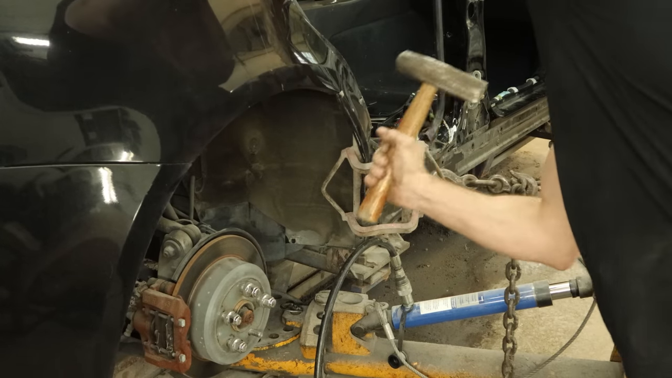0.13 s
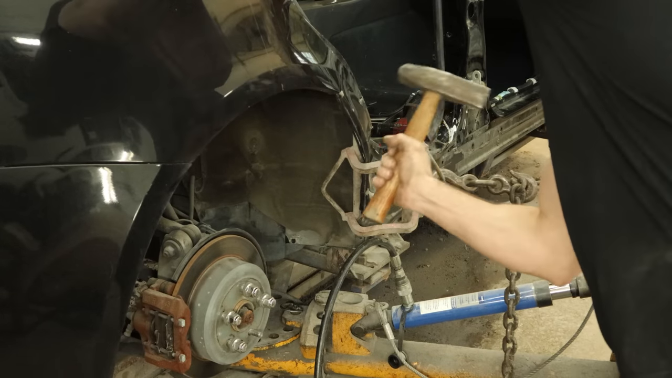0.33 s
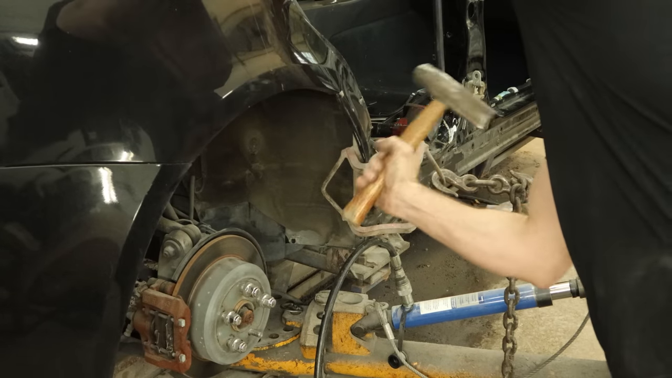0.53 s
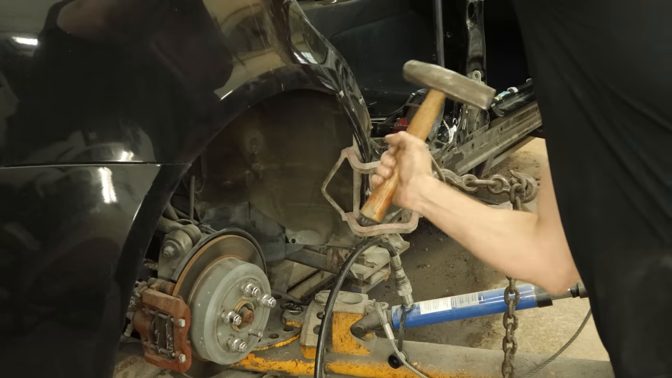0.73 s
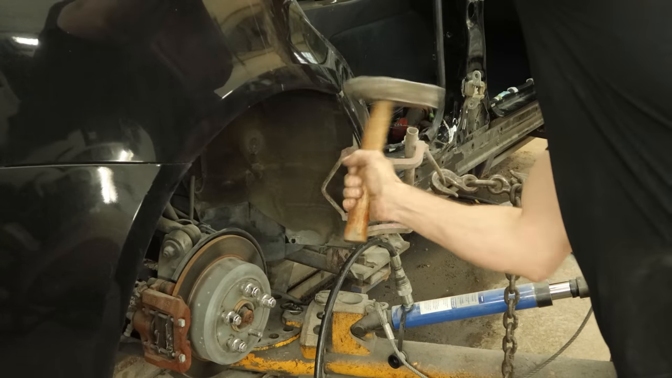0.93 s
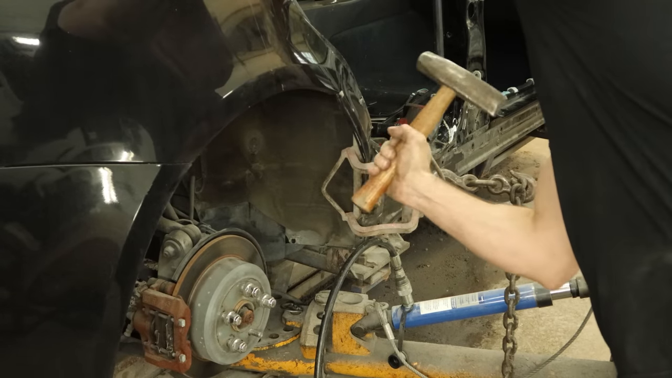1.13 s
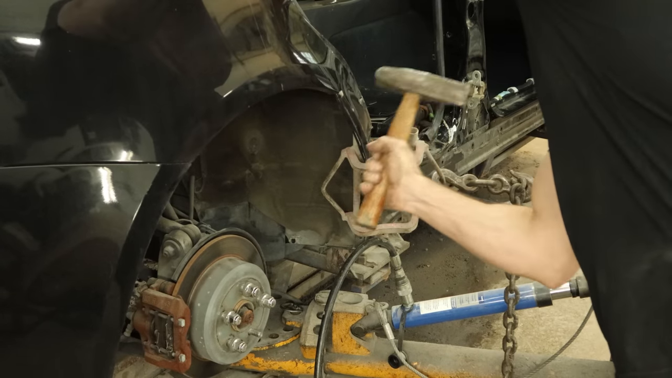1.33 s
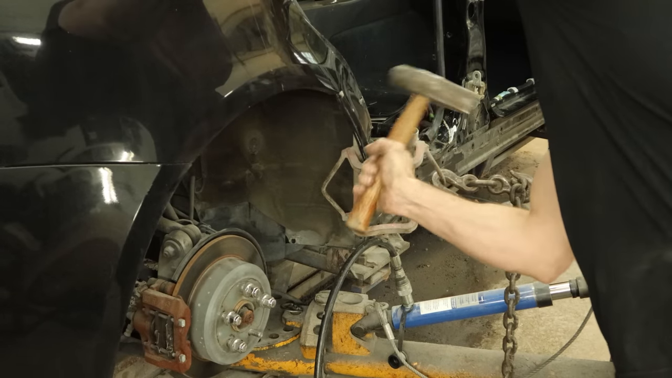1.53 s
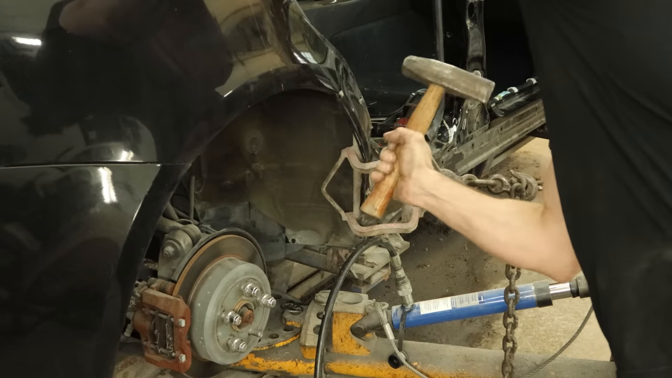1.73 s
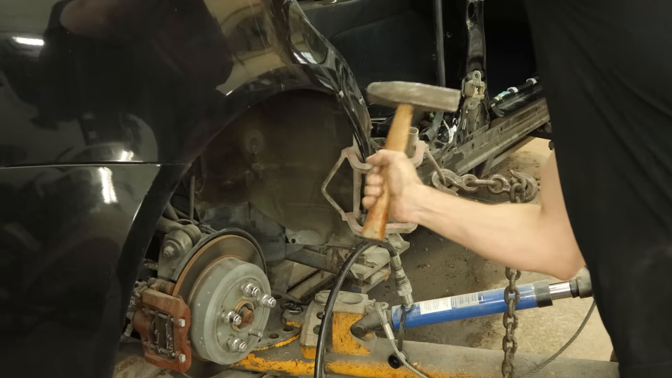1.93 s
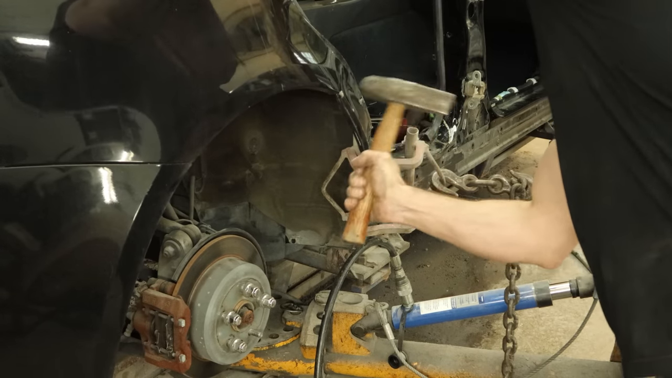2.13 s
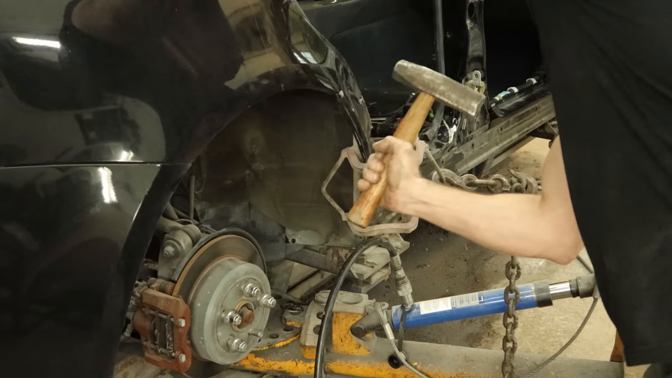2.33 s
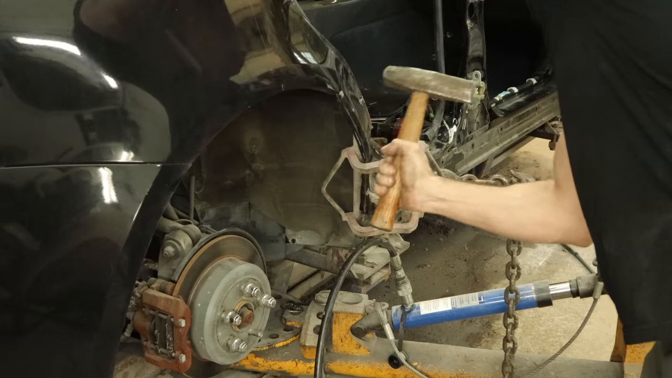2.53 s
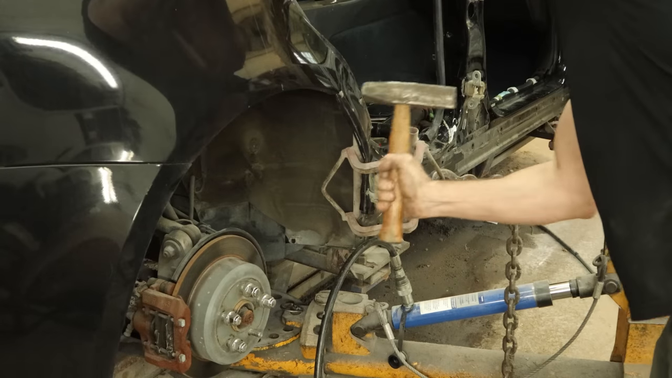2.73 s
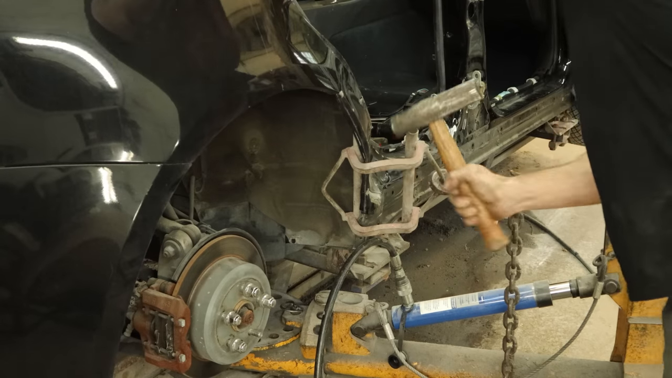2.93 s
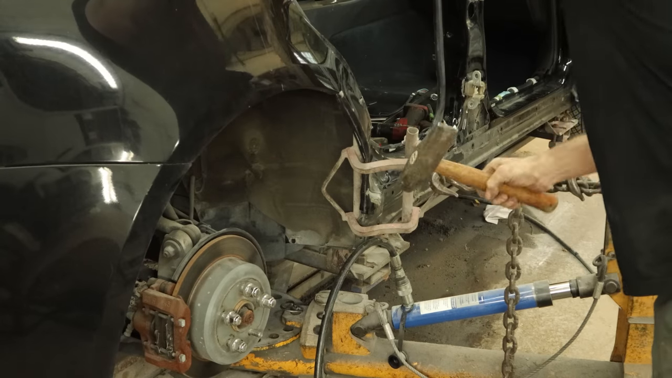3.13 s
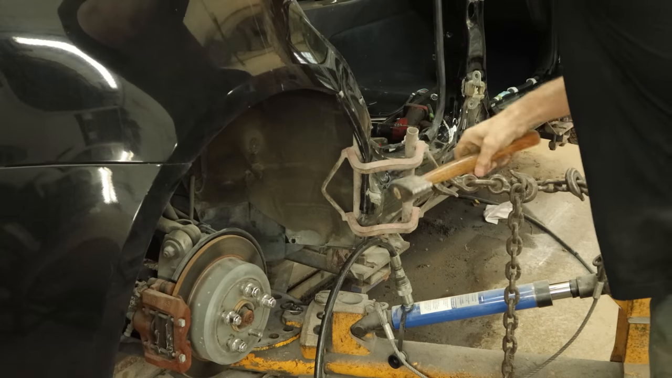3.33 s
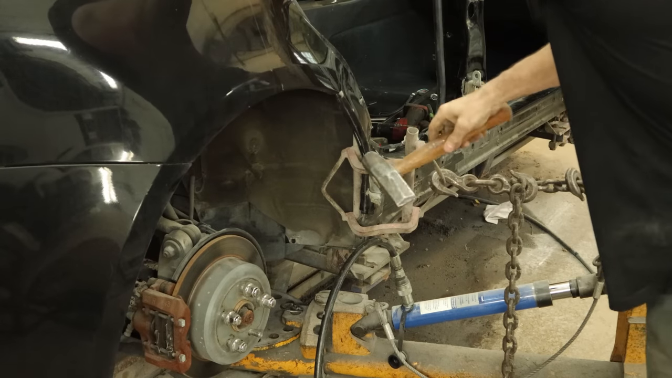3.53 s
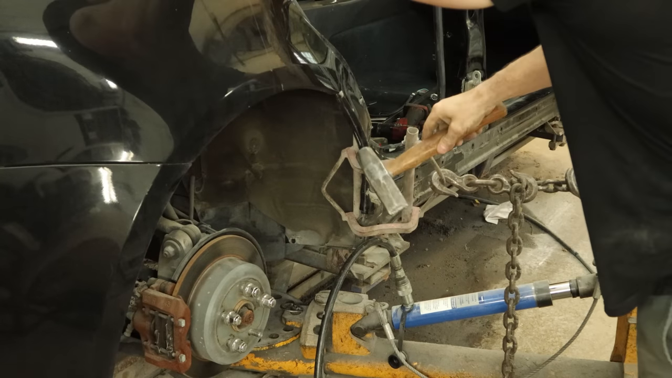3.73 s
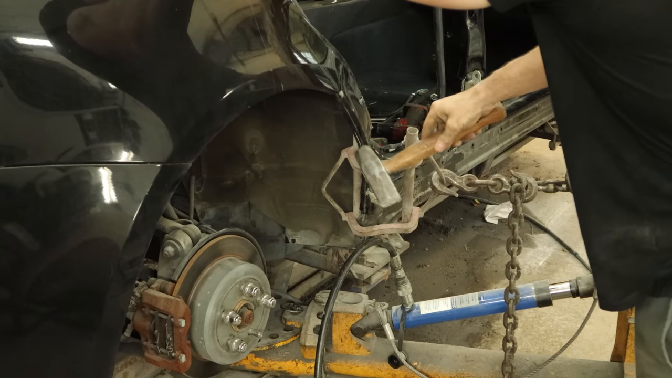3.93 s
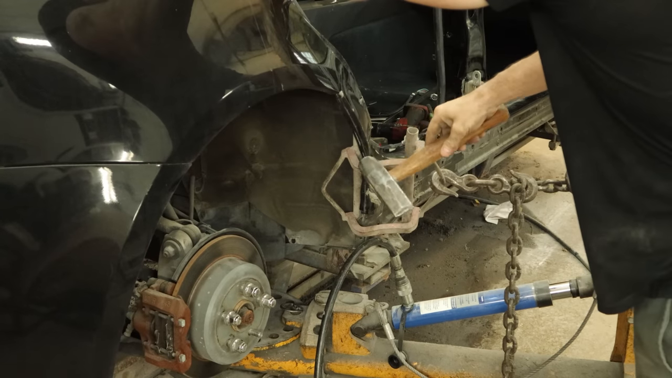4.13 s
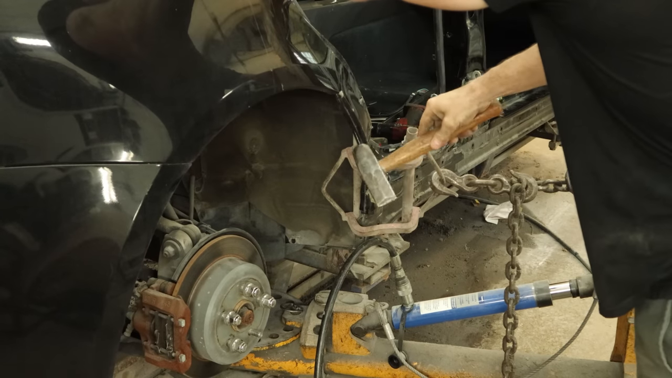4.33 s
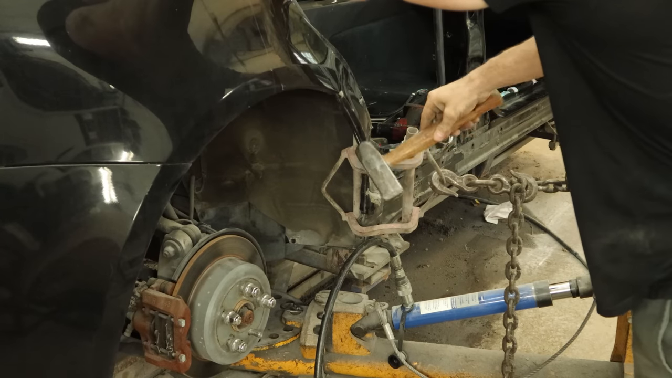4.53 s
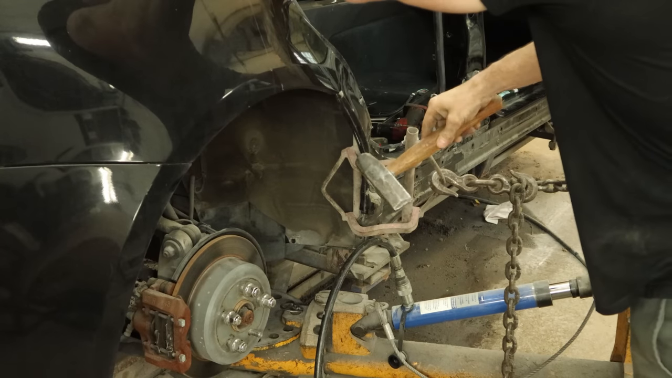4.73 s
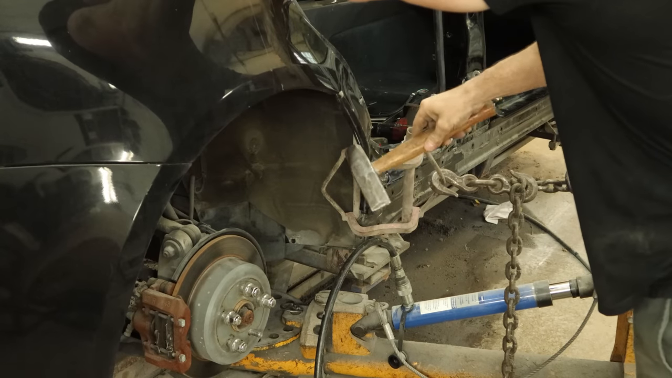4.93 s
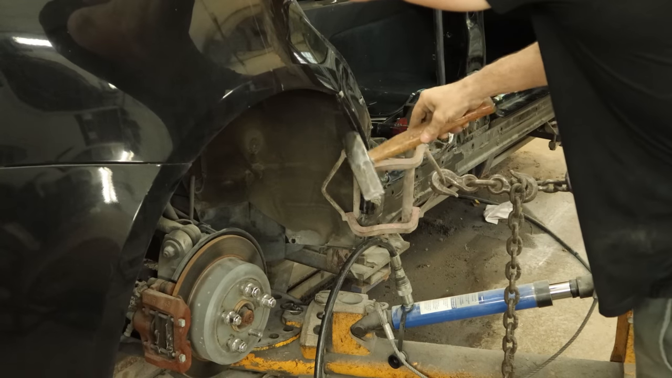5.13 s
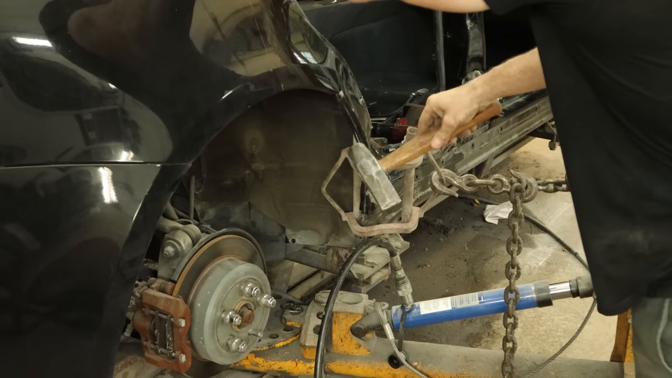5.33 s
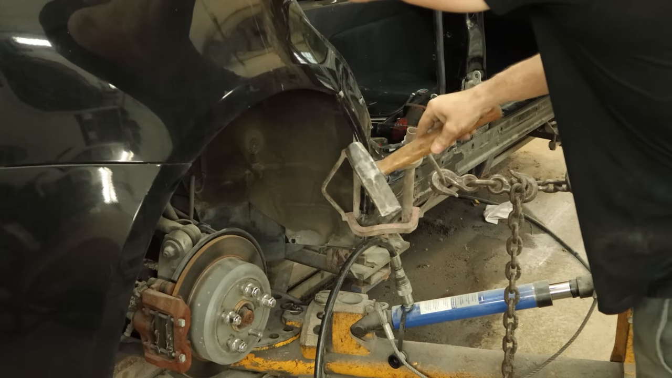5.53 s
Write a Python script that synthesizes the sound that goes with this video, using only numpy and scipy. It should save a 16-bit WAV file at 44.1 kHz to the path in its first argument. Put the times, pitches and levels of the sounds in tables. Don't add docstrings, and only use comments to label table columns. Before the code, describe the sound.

In an echoing repair workshop, a heavy hammer bangs a car's wheel arch nine times at a quick steady pace, each a short hard clang with low body. After a faint scuff and a pause, seven lighter glancing taps ring more clearly. Machinery hums and hisses faintly. The close microphone's limiter squashes the hard blows.

```python
import sys
import numpy as np
from scipy import signal
from scipy.fft import rfft, irfft
from scipy.io import wavfile
from scipy.ndimage import uniform_filter1d, minimum_filter1d

SR = 44100
rng = np.random.default_rng(int(sys.argv[2]) if len(sys.argv) > 2 else 0)


def rack_gain(trim_db):
    fader = np.asarray(trim_db, float)
    return 10 ** (fader / 20)


def dump(signal):
    limited = np.clip(np.atleast_2d(signal).T, -1, 1)
    pcm = np.round(limited * 32767).astype(np.int16)
    wavfile.write(sys.argv[1], SR, pcm)


N = 246210

# (frequency [Hz], level [dB per Hz])
HUM_SPECTRUM = [(18, -31.5), (40, -28.5), (65, -11.5), (90, -9.5), (145, -6.5), (230, -16.5), (310, -7.5),
                (420, -20), (960, -23), (2000, -34), (4000, -36), (10000, -35.5), (10700, -46),
                (16000, -54.5)]
# (frequency [Hz], width [Hz], level [dB])
MACHINE_WHINES = [(88, 10, -62), (4400, 200, -82), (6500, 150, -85), (7300, 260, -77), (8700, 200, -83),
                  (9650, 550, -75), (11950, 300, -82), (12650, 200, -89), (14600, 2600, -83)]
# (frequency [Hz], t60 [s])
HALL_T60 = [(60, 1), (200, 0.83), (700, 0.8), (2000, 0.89), (5000, 0.6), (12000, 0.37)]
# (frequency [Hz], level [dB])
HALL_COLOUR = [(50, 1), (200, 1), (700, -2), (2500, 1), (6000, 7), (14000, 2.5)]
# (frequency [Hz], level [dB])
CROWD_SHARE = [(150, -14), (800, -10), (1800, -6), (3000, 0)]
# (time [s], strength [dB], weight: bass up and treble down [dB], top octave [dB])
TAPS = [
    (3.172, -45.5, -4, 3),
    (3.772, -18.5, -3, -1.5),
    (4.089, -16, -1, -7),
    (4.385, -12, 1, 7),
    (4.6821, -5.5, 1.5, 2),
    (4.972, -15, 3, 3.5),
    (5.248, -16.5, 0.05, 2),
    (5.531, -15, 2.5, -1),
]
TAP_SPOTS_CM = [60, 89.3, 43.9, 17.85, 103.2, 41, 105.3, 23.15]
SILL_DENTS_HZ = [480, 592, 650, 910, 1003, 1079, 1215, 1300, 1470, 1620, 1800, 2330, 3125, 3595]
# (frequency [Hz], level [dB], t60 [s])
SILL_MODES = [(179, 2, .17), (228, -8, .22), (266, -13, .2), (345, -10, .11), (470, -10, .16)]
# (frequency [Hz], level [dB per Hz])
SILL_SHEET = [(24, -50.5), (60, -56), (130, -4.5), (175, -2.5), (300, -2.5), (500, -4), (1000, -10),
              (1600, -13), (2300, -21), (4000, -26), (7700, -35), (13000, -50), (16500, -55)]
# (frequency [Hz], t60 [s])
SILL_DAMPING = [(60, 0.49), (200, 0.1), (1000, 0.2), (4000, 0.064), (12000, 0.076)]
# (time [s], strength [dB], weight: bass up and treble down [dB], top octave [dB])
BLOWS = [
    (.3375, -4, 0, 2),
    (.7245, -1.5, 0, -1.5),
    (1.0628, -.5, 0, -2),
    (1.390, -2.5, 1.5, -4),
    (1.699, -1.5, 0, 1),
    (1.992, -6, 1, -7),
    (2.283, -6, 0.5, -0.5),
    (2.550, -4.5, 0, 1),
    (2.814, -4, -1, 0),
]
# (frequency [Hz], level [dB])
BLOW_DENT = [(1150, 0), (2100, -4)]
# (frequency [Hz], level [dB], t60 [s])
ARCH_MODES = [(117, -3, .14), (325, -10, .15), (380, -11, .07), (432, -7, .16), (560, -5, .065),
              (700, 2, .06), (748, -2, .05), (803, -7, .07), (930, -10, .05), (1080, -6, .05),
              (1210, -9, .06), (1325, -10, .07), (1392, -11, .07), (1606, -4, .09), (1720, -10, .06),
              (1775, -9, .06), (2000, -14, .05), (2070, -14, .05), (2568, -14, .05)]
# (frequency [Hz], level [dB per Hz])
ARCH_SHEET = [(24, -55), (50, -10.5), (110, -13.5), (230, -5), (330, 1.5), (480, -3), (715, 4),
              (1000, -4.5), (1600, -6.5), (2700, -19), (4200, -28), (8500, -35.5), (13000, -43.5),
              (16500, -56)]
# (frequency [Hz], t60 [s])
ARCH_DAMPING = [(60, 0.14), (300, 0.15), (1000, 0.072), (4000, 0.032), (12000, 0.072)]
# (lower edge [Hz], share of time muted [0-1])
TOP_MUTES = [(12800, .25), (13500, .42), (14300, .52), (15000, .56), (15800, .93)]

TREBLE_PER_WEIGHT = -1.2
SKID_PER_DB = 0.1163


def evened(x):
    return x / np.sqrt(np.mean(x ** 2) + 1e-20)


def read(points, hz):
    f, value = np.transpose(points)
    return np.interp(np.log(hz + 1), np.log(f + 1), value)


def add(mix, s, sound):
    part = mix[round(s * SR):][:len(sound)]
    part += sound[:len(part)]


def machinery(hum_db=-56, patchy_db=2.5):
    hz = np.fft.rfftfreq(2048, 1 / SR)
    a, b, c, d, patches = rng.standard_normal((N // 512 + 5, len(hz), 5)).T
    patches = evened(uniform_filter1d(uniform_filter1d(patches, 8, 0), 8, 1))
    hum = (a + 1j * b) * rack_gain(read(HUM_SPECTRUM, hz)[:, None] + patchy_db * patches)
    hum = signal.istft(hum, nperseg=2048, noverlap=1536)[1][:N]
    power = sum(rack_gain(2 * db) / width * np.exp(-((hz - f) / width) ** 2 * 2) for f, width, db in MACHINE_WHINES)
    whine = (c + 1j * d) * np.sqrt(power)[:, None]
    whine = signal.istft(whine, nperseg=2048, noverlap=1536)[1][:N]
    whine_level = np.sqrt(sum(rack_gain(2 * db) for f, width, db in MACHINE_WHINES))
    return rack_gain(hum_db) * evened(hum) + whine_level * evened(whine)


def halls():
    slots = np.arange(100, SR * 3 // 2 - 20, 20)
    places = slots + rng.integers(0, 20, (2, len(slots)))
    signs = rng.choice([-1., 1.], (2, len(slots)))
    echoes = np.zeros((2, SR * 3 // 2))
    np.put_along_axis(echoes, places, signs, 1)
    hz, t, z = signal.stft(echoes, SR, nperseg=512)
    z = z * rack_gain(read(HALL_COLOUR, hz)[:, None] - 60 * t / read(HALL_T60, hz)[:, None])
    return rfft(signal.istft(z, SR, nperseg=512)[1], 2 * SR)


def humps(modes, hz):
    return sum(rack_gain(db) / (1 + 1j * (hz - f) * t60 * 2 * np.pi / np.log(1000)) for f, db, t60 in modes)


def sheet_modes(modes, sheet, damping, modes_db, t, count=600):
    place, turn, loss = rng.random((3, count))
    crowd_hz = 50 + 16000 * ((np.arange(count) + place) / count) ** 2
    crowd_t60 = read(damping, crowd_hz) * (0.46 + 2.37 * loss)
    crowd_db = read(sheet, crowd_hz) + read(CROWD_SHARE, crowd_hz)
    crowd_db += 5 * np.log10(crowd_hz) - 10 * np.log10(crowd_t60 * 30)
    strong_hz, strong_db, strong_t60 = np.transpose(modes)
    hz = np.r_[crowd_hz, strong_hz]
    db = np.r_[crowd_db, strong_db + modes_db]
    t60 = np.r_[crowd_t60, strong_t60]
    phase = np.r_[turn, 0 * strong_hz + .5]
    angle = 2 * np.pi * (hz[:, None] * t + phase[:, None])
    fade = rack_gain(db[:, None] - 60 * t / t60[:, None]) * (1 - np.exp(-hz[:, None] * t / 1.13))
    return hz, fade * np.sin(angle), fade * np.cos(angle)


def chatter(t, level_db, skid_ms):
    touch = 1 - np.exp(-(t * 3000 / skid_ms) ** 2)
    return touch * rack_gain(level_db - 60 * t / 0.0082) * np.diff(rng.standard_normal(len(t) + 1))


def panel(hits, dents, modes, sheet, damping, modes_db, dent_t60, crack_db, spread,
          wet_db, wet_modes_db, build_s, wet_dents_db, lean_db, hard_skid_ms):
    t = np.arange(SR // 4) / SR
    hz, swing, quarter = sheet_modes(modes, sheet, damping, modes_db, t)
    scatter = spread * np.r_[np.ones(len(hz) - len(modes)), .25 * np.ones(len(modes))]
    echoes, hall_hz = halls(), np.fft.rfftfreq(2 * SR, 1 / SR)
    power = rack_gain(2 * read(sheet, hall_hz)) + abs(rack_gain(wet_modes_db) * humps(modes, hall_hz)) ** 2
    out = np.zeros(N)
    for (s, strength_db, weight_db, top_db), dent in zip(hits, dents):
        bass_db, treble_db = lean_db + weight_db, TREBLE_PER_WEIGHT * weight_db
        skid_ms = hard_skid_ms * rack_gain(-SKID_PER_DB * strength_db)
        lean = [(250, bass_db), (600, 0), (1500, 0),
                (4000, treble_db), (7000, treble_db), (12000, treble_db + top_db)]

        a, b = scatter * rng.standard_normal((2, len(hz)))
        push = rack_gain(read(lean, hz))
        ring = (push * (1 + a)) @ swing + (push * b) @ quarter
        ring /= abs(ring).max()
        ring -= sum(rack_gain(db - 60 * t / dent_t60) * np.sin(2 * np.pi * f * t) for f, db in dent)
        ring *= 1 - np.exp(-(t * 1000 / skid_ms) ** 2)
        ring += chatter(t, crack_db + treble_db + top_db, skid_ms)
        ring *= rack_gain(strength_db) / abs(ring).max()
        add(out, s, ring)

        aim = 2 * spread * rng.standard_normal()
        echo = np.cos(aim) * echoes[0] + np.sin(aim) * echoes[1]
        dent_humps = humps([(f, db, dent_t60) for f, db in dent], hall_hz)
        colour = np.sqrt(power + abs(rack_gain(wet_dents_db) * dent_humps) ** 2)
        tail = irfft(echo * colour * rack_gain(read(lean, hall_hz)))[:SR * 3 // 2]
        tail *= 1 - np.exp(-(np.arange(len(tail)) / SR / (build_s + skid_ms / 1000)) ** 2)
        add(out, s, rack_gain(wet_db) * tail * np.linalg.norm(ring) / np.linalg.norm(tail))
    return out


def dents_under(strength_db, spot_cm):
    hz = np.array(SILL_DENTS_HZ)
    bending = .0205
    reach = np.sin(bending * np.sqrt(hz) * spot_cm) ** 8
    hz, reach = hz[reach > .1], reach[reach > .1]
    db = 6.5 + 1.07 * strength_db - 5.5 * np.log2(hz / 600) + 20 * np.log10(reach)
    return list(zip(hz, db))


def sill_taps():
    dents = [dents_under(tap[1], cm) for tap, cm in zip(TAPS, TAP_SPOTS_CM)]
    return panel(TAPS, dents, SILL_MODES, SILL_SHEET, SILL_DAMPING,
                 modes_db=13.5, dent_t60=0.069, crack_db=-13.5, spread=.6, wet_db=-8, wet_modes_db=2,
                 build_s=0.034, wet_dents_db=2, lean_db=0.9, hard_skid_ms=1.72)


def arch_blows():
    return panel(BLOWS, [BLOW_DENT] * len(BLOWS), ARCH_MODES, ARCH_SHEET, ARCH_DAMPING,
                 modes_db=13.5, dent_t60=0.0045, crack_db=-33.5, spread=0.36, wet_db=-3.5, wet_modes_db=0.0,
                 build_s=0.011, wet_dents_db=-12, lean_db=4.0, hard_skid_ms=0.36)


def scene():
    return (arch_blows() + sill_taps() + machinery())[None]


def slow_gain(dry):
    sink_db_per_s, creep_db_per_s, loud_db, fresh_s = 26, 5, -10.5, 0.093
    hold = round(fresh_s * SR)
    level_db = 20 * np.log10(abs(np.r_[np.zeros(hold // 2), dry][:N]) + 1e-9)
    peak_db = -minimum_filter1d(-level_db, hold)
    loudness = np.clip((peak_db - loud_db) / 4, 0, 1)
    drift_db = np.cumsum(creep_db_per_s - sink_db_per_s * loudness) / SR
    return drift_db - np.maximum.accumulate(drift_db)


def limiter(x):
    threshold_db, hold_s, release_db_per_s, ceiling = -13.6, .055, 190, .2
    over_db = np.maximum(20 * np.log10(abs(x[0]) + 1e-9) - threshold_db, 0)
    hold = round(hold_s * SR)
    held_db = -minimum_filter1d(-np.r_[np.zeros(hold // 2 - 12), over_db][:N], hold)
    release_db = release_db_per_s * np.arange(N) / SR
    duck_db = np.maximum.accumulate(held_db + release_db) - release_db
    return np.clip(x / rack_gain(uniform_filter1d(duck_db, size=90)), -ceiling, ceiling)


def gate(x):
    hz, t, z = signal.stft(x, SR, nperseg=1024)
    edges = [f for f, share in TOP_MUTES] + [SR]
    for (low, share), high in zip(TOP_MUTES, edges[1:]):
        band = (hz >= low) & (hz < high)
        power = uniform_filter1d((abs(z[0, band]) ** 2).mean(0), size=3)
        z[0, band] *= power > np.quantile(power, share)
    return signal.istft(z, SR, nperseg=1024)[1][:, :N]


def band_limit(x):
    return signal.sosfilt(signal.butter(12, 16810, fs=SR, output="sos"), x)


def record(dry):
    x = limiter(dry * rack_gain(slow_gain(dry[0])))
    x = signal.oaconvolve(x, signal.firwin(255, 16600, fs=SR)[None], "same")
    x = signal.sosfilt(signal.butter(2, 45, "high", fs=SR, output="sos"), gate(x))
    return band_limit(x)


dry = scene()
out = record(dry)
dump(out)
```